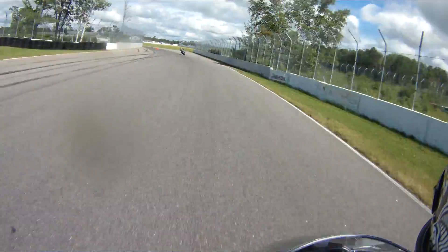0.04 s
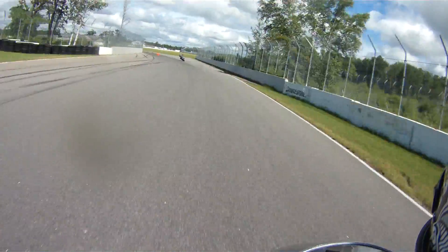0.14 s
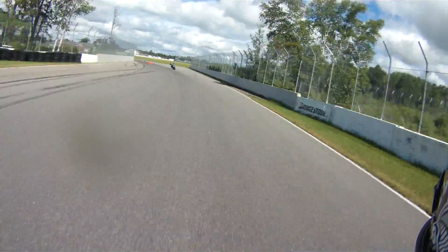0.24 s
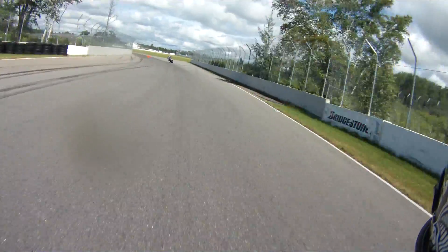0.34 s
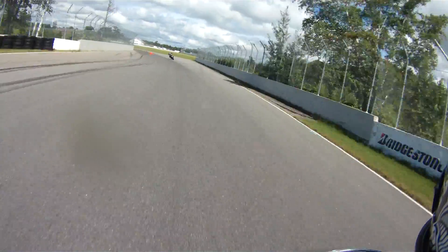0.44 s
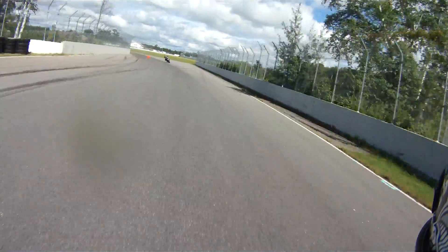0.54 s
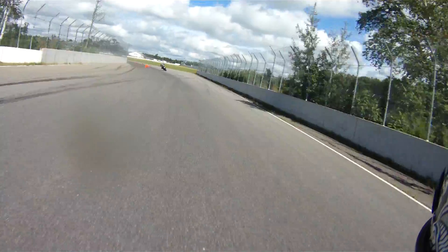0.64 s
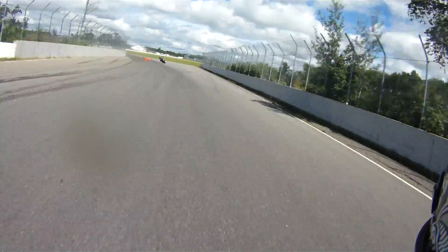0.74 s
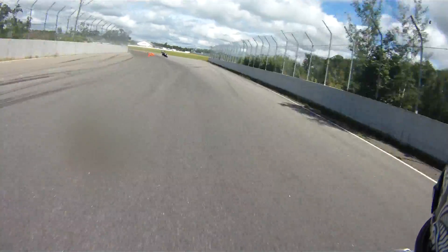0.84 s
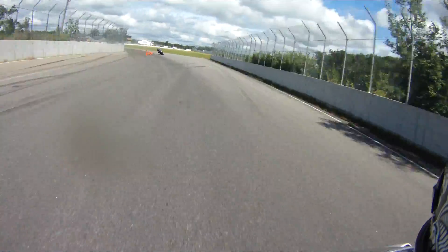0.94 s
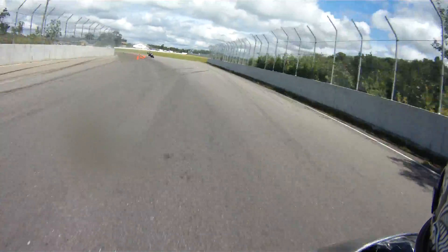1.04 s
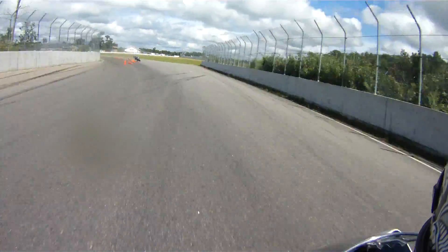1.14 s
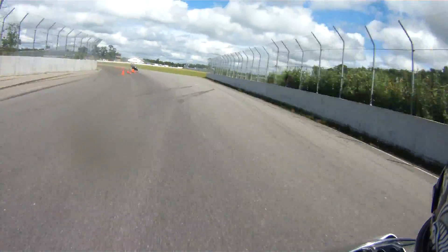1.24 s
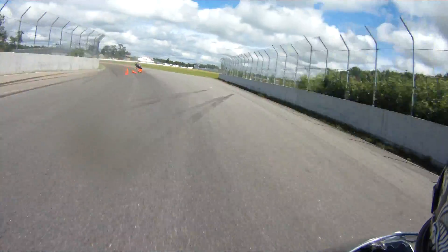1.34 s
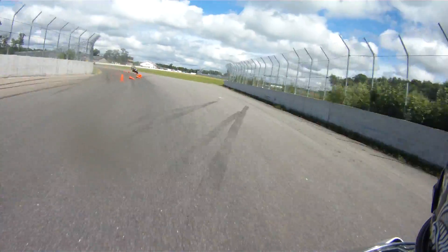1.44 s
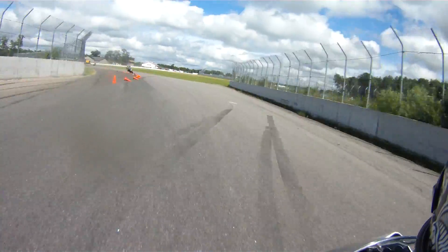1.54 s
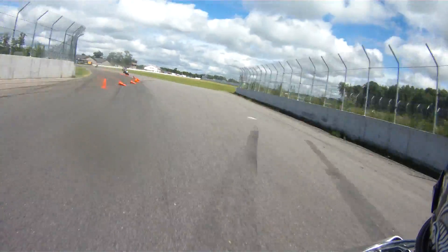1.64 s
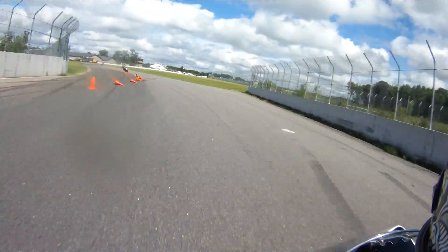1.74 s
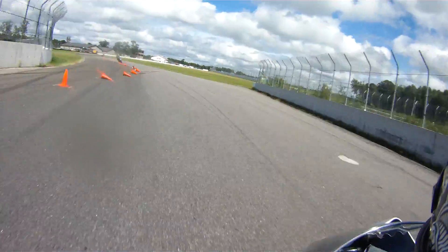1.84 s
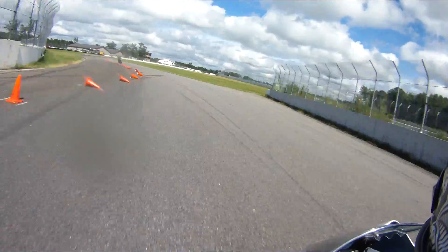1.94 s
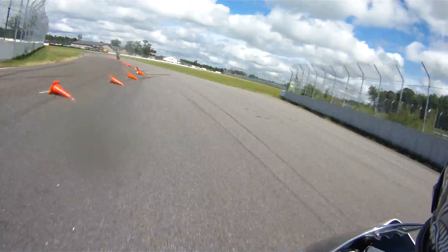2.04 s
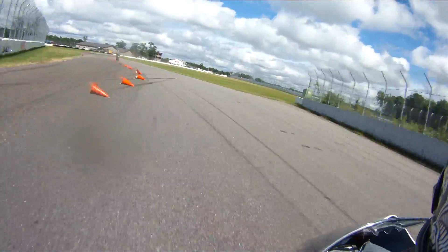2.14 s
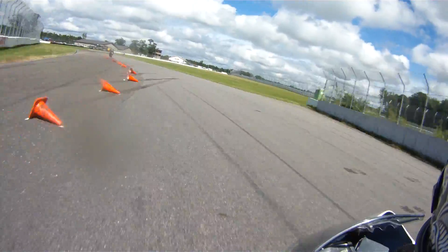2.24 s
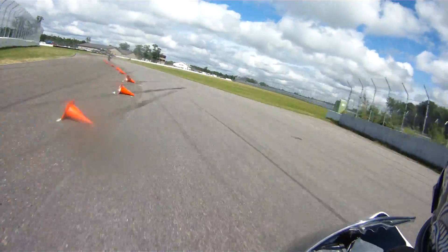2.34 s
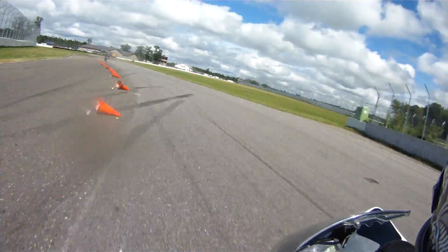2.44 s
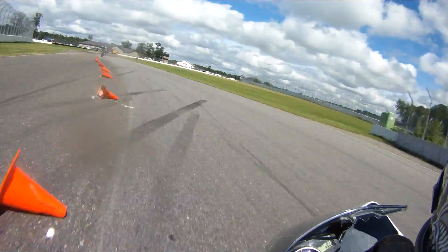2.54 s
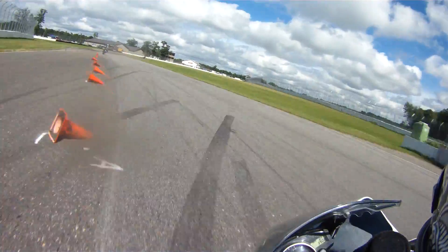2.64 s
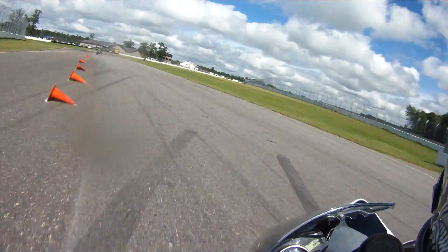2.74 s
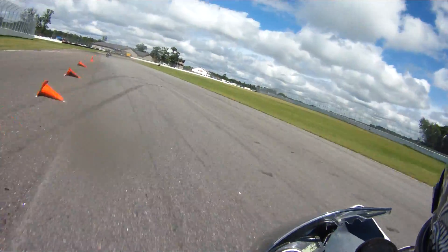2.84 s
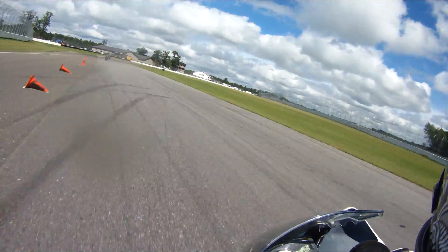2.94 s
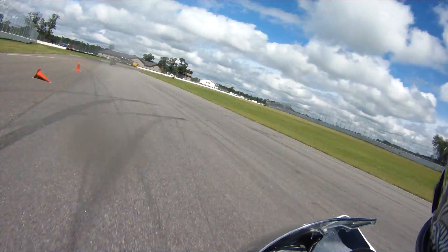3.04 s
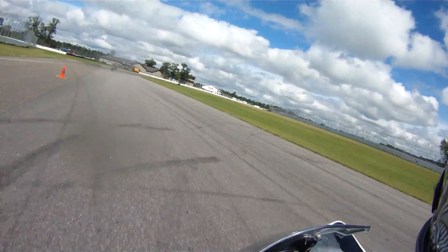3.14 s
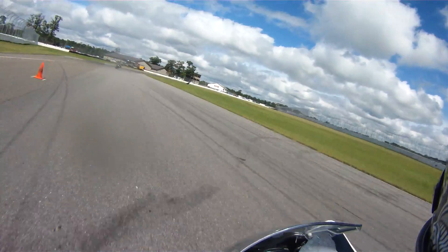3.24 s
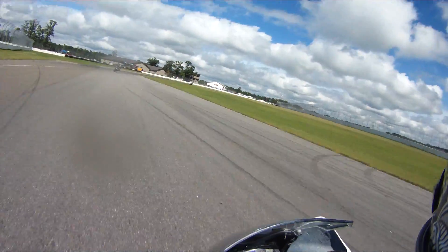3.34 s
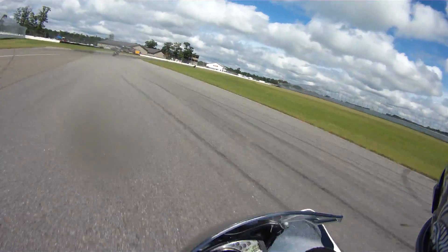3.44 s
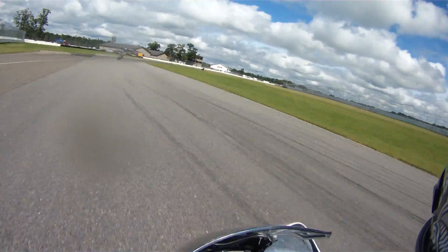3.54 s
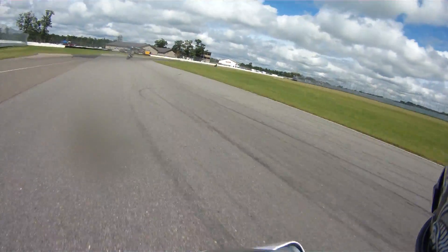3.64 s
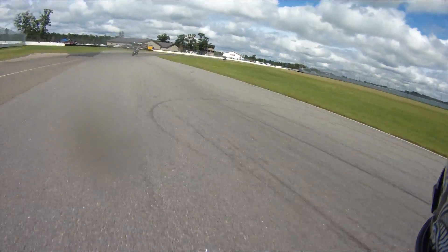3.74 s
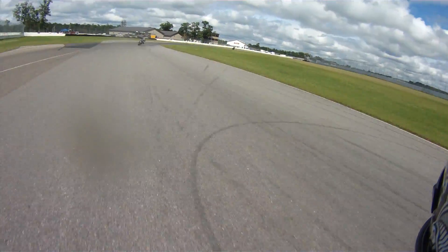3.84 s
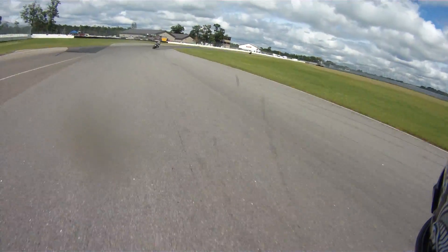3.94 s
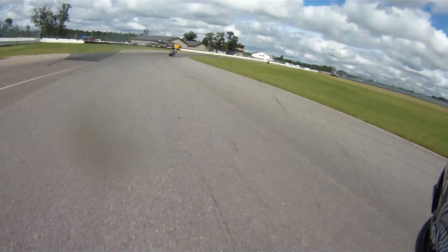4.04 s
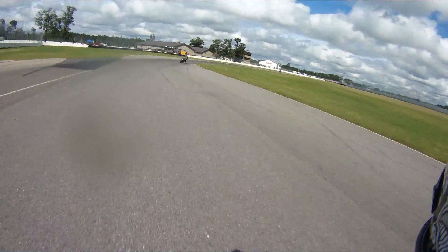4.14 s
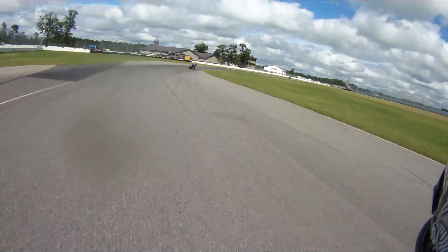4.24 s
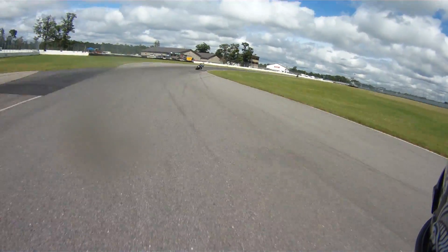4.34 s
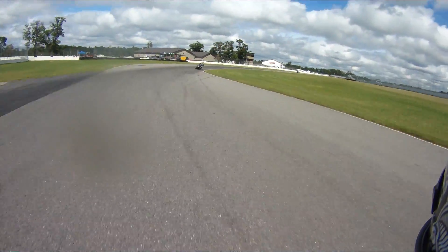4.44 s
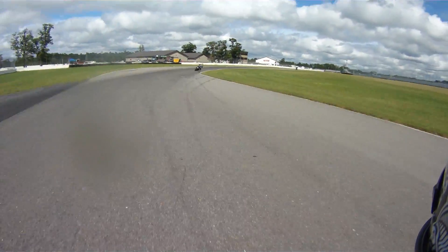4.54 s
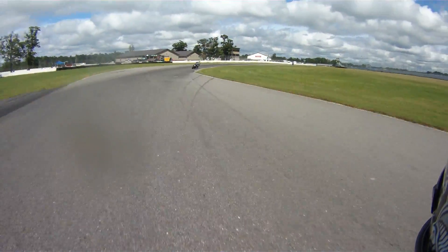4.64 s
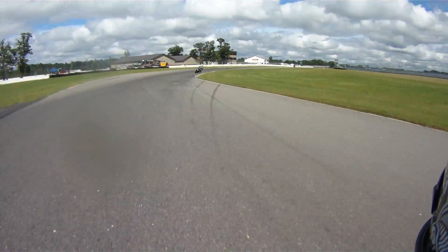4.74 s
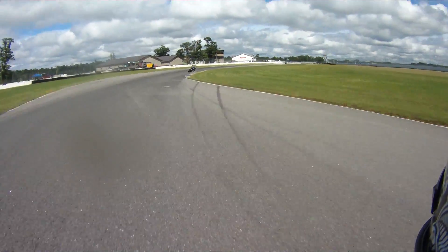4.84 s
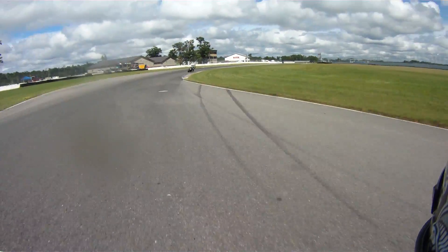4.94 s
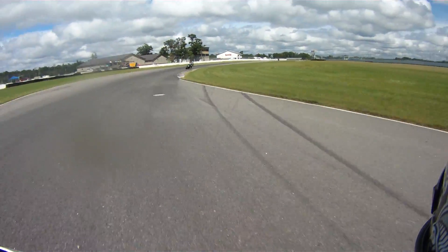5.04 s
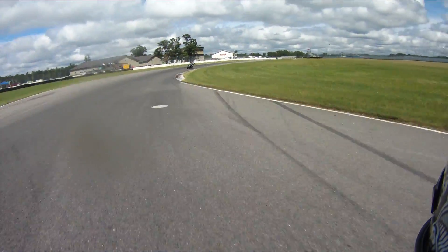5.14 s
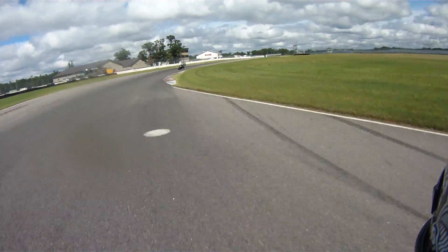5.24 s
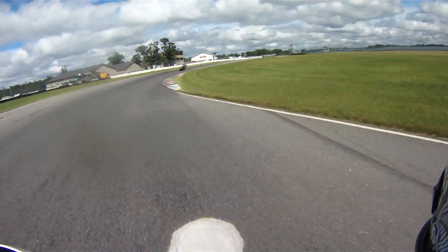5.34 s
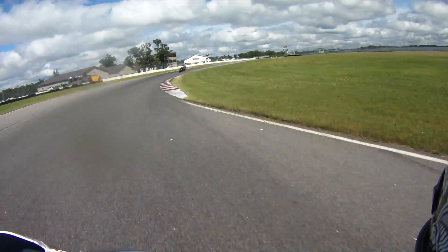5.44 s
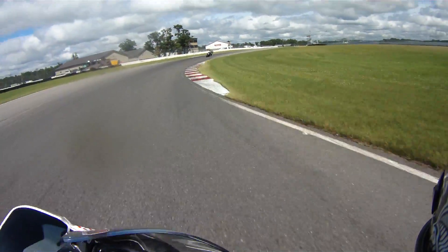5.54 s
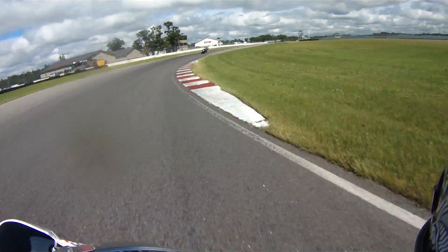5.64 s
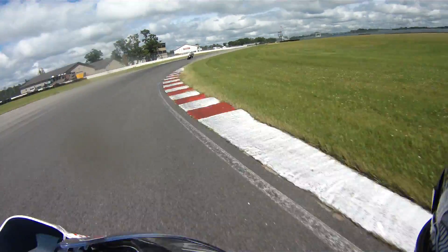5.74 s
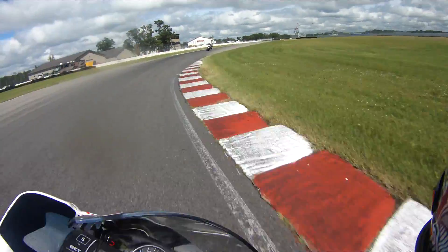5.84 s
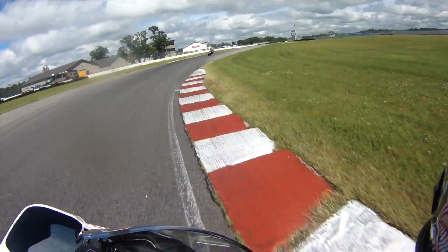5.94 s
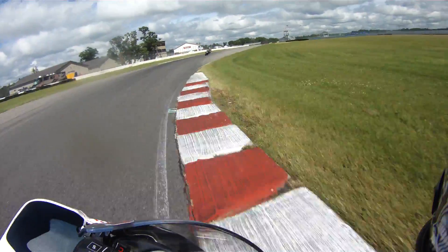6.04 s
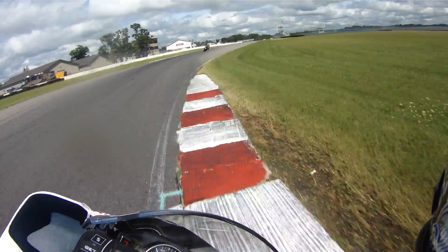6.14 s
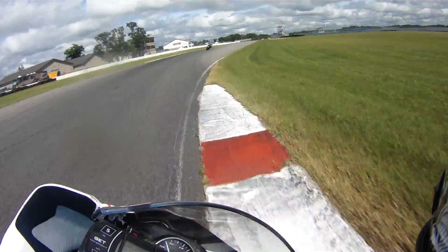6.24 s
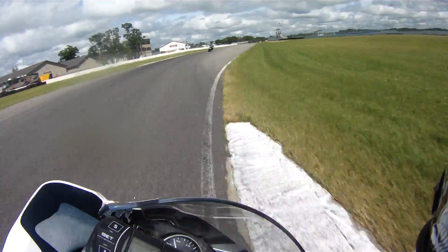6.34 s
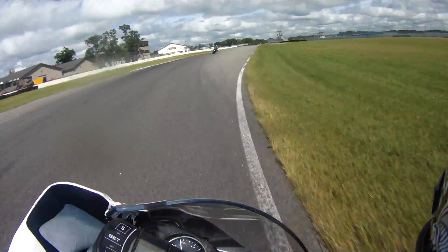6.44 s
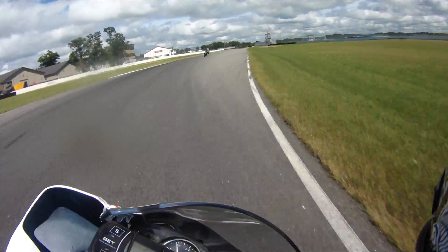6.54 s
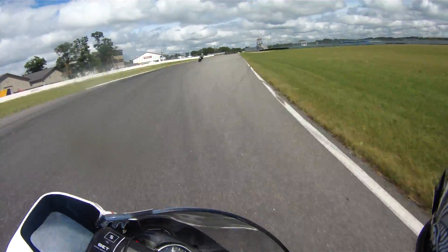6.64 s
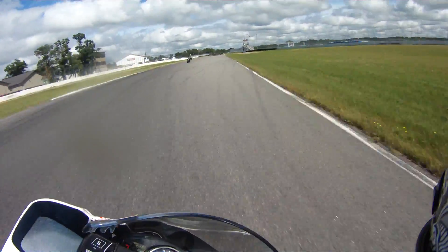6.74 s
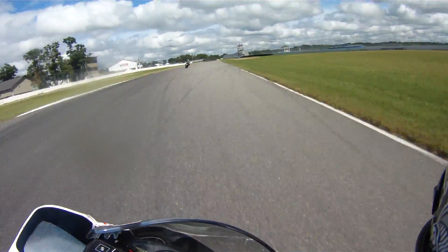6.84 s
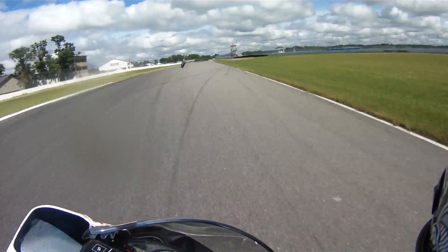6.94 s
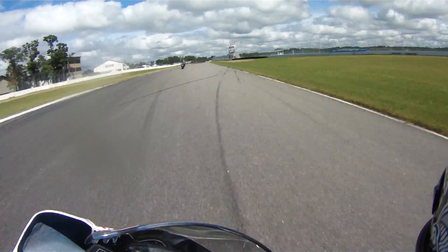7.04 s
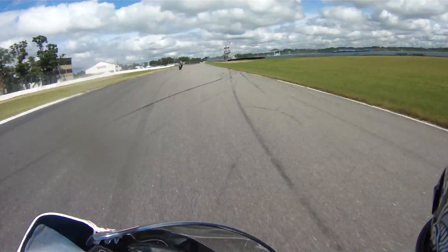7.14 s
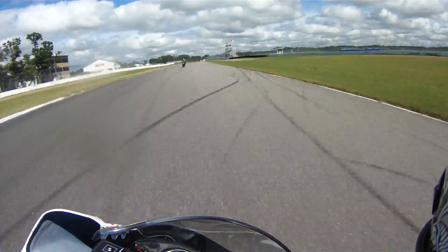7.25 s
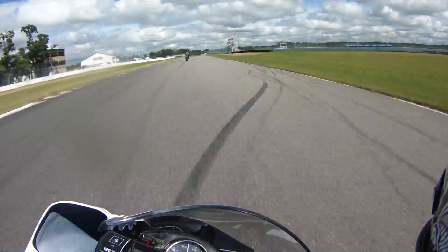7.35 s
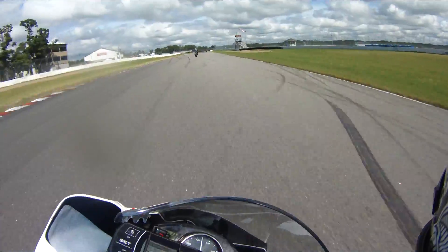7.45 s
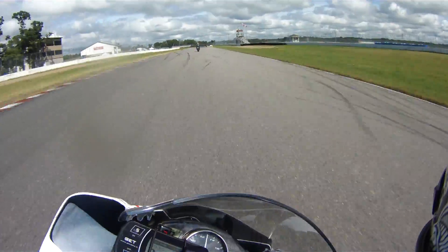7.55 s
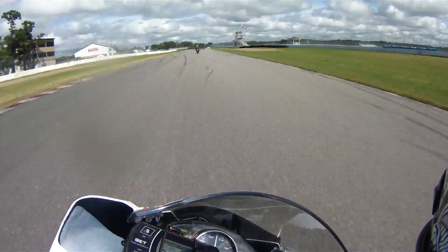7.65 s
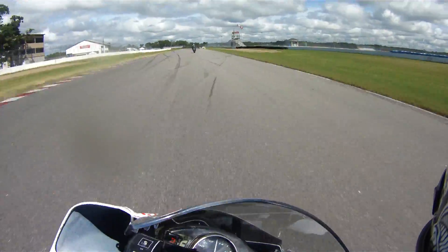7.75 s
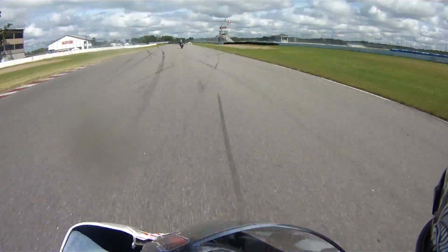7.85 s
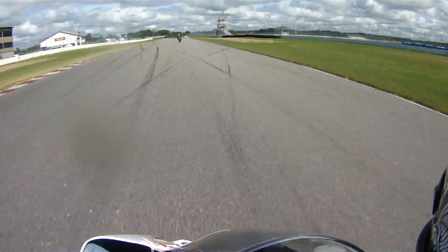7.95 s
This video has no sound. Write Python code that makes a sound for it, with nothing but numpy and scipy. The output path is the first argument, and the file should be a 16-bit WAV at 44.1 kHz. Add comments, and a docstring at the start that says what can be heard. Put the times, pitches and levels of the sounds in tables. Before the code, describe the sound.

Muffled wind roars and thumps against an enclosed microphone riding on a motorcycle. The engine, briefly audible, falls to a faint, uneven hum, howls for about half a second, and cuts out to a murmur with hollow growls of side wind. Tiny grit ticks come and go before a strong, nearly pure howl rises in pitch to the end, with stronger wind.

```python
"""On board a four-cylinder sport bike on a race track, microphone shut in a camera housing.
The intake howls a near-pure firing note when the throttle is open and murmurs when it is shut:
a sine follows the firing rate, with faint sines at other multiples around it.
Wind buffets, roars and hisses over the housing, made of bands of noise that are dull above 2 kHz.
Coarse hollow growls are noise in a broad resonance; small ticks are filtered clicks."""
import sys
import numpy as np
from scipy import signal
from scipy.fft import rfft, irfft, next_fast_len
from scipy.io import wavfile
from scipy.ndimage import uniform_filter1d

SR = 44100
rng = np.random.default_rng(int(sys.argv[2]) if len(sys.argv) > 2 else 0)


def inscribe(sig):
    """Save sig as 16-bit PCM at rate SR to the path in sys.argv[1].

    A 1-D sig is mono; a 2-D sig holds one channel per row.
    Samples are clipped to [-1, 1] before scaling.
    """
    pcm = np.round(np.clip(np.atleast_2d(sig).T, -1, 1) * 32767)
    wavfile.write(sys.argv[1], SR, pcm.astype(np.int16))


N = 352403
T = np.arange(N) / SR  # time of each sample, s


def undb(db):
    """Turn a level in dB into a gain."""
    return 10 ** (np.asarray(db) / 20)


def curves(table):
    """Join the values in each column of a table by straight lines in time."""
    time_s, *columns = np.transpose(table)
    return [np.interp(T, time_s, column) for column in columns]


def walk(rate_hz):
    """Wander at random: levels held for 1 / rate_hz seconds, smoothed twice, with a spread of 1."""
    hold = int(SR / rate_hz)
    steps = np.repeat(rng.standard_normal(N // hold + 1), hold)
    smooth = uniform_filter1d(uniform_filter1d(steps, hold), hold)[:N]
    return smooth / smooth.std()


def noise():
    """Give the frequencies, spectrum and length of white noise with unit power per Hz."""
    size = next_fast_len(N + N % 2, True)
    hz = np.fft.rfftfreq(size, 1 / SR) + 1e-9  # never zero, so its logarithm exists
    return hz, rfft(rng.standard_normal(size)) * np.sqrt(SR / 2), size


def engine(steady_db=0.5, waver_db=1.3):
    """Firing note and its orders; combustion is even under load and lumpy with the throttle shut."""
    # engine speed: time_s, firing_rate_hz
    firing = [(0.0, 324.0), (0.05, 330), (0.18, 332.1), (0.6, 331.5), (1.0, 327.7), (1.5, 316.8),
              (2.0, 309.9), (2.5, 319.1), (3.02, 342.1), (3.22, 348.3), (3.52, 350.7), (3.62, 341),
              (3.75, 326.2), (4.3, 311.1), (4.55, 307.3), (5.0, 305.4), (5.45, 319.5), (5.81, 334.9),
              (6.3, 353.5), (6.52, 365.7), (6.8, 377.4), (7.15, 387), (7.6, 397.2), (7.99, 401.4)]
    # throttle, heard as the level of the firing note: time_s, level_db
    throttle = [(0.0, -20.5), (0.04, -17), (0.19, -24), (0.225, -34), (0.6, -48), (0.8, -38), (0.95, -35.5),
                (1.08, -41), (1.2, -37), (1.38, -41), (1.5, -36.5), (1.7, -40.5), (1.9, -35.5), (2.2, -36),
                (2.5, -35.5), (2.65, -31), (2.82, -29), (3.02, -17), (3.12, -16.5), (3.44, -13.5),
                (3.57, -15.5), (3.65, -32.5), (3.69, -38.5), (3.76, -35), (3.95, -33.5), (4.3, -36),
                (4.52, -34.5), (4.6, -41), (4.7, -34.5), (5.05, -34), (5.25, -32.5), (5.5, -31.5),
                (5.63, -25.5), (5.69, -32.5), (5.77, -32.5), (5.795, -27.5), (6.1, -24.5), (6.39, -7.5),
                (6.6, -9), (6.75, -9.5), (7.0, -10.5), (7.2, -11), (7.99, -9)]
    # orders from unequal cylinders: every quarter of the firing rate from 0.5 to 7.5, but not the note
    faint_orders = np.delete(np.arange(2, 31), 2) / 4
    # one level per faint order, at full throttle: level_db
    faint_levels = [-49, -47.5, -42.5, -46, -44.5, -44.5, -51, -47.5, -50, -46.5, -52, -48.5, -53, -52,
                    -50.5, -52.5, -57, -53, -55, -60.5, -57.5, -58.5, -61.5, -59.5, -61.5, -60.5, -64,
                    -60.5]
    # an order swells or sinks for a while, keyed by order: centre_s, half_length_s, lift_db
    swells = {.75: [(6.33, 0.13, 6), (7.3, .25, 6), (7.8, .2, 6)], 1.25: [(6.6, .2, 2), (7.1, .25, -5.5),
              (7.8, .2, 5.5)], 1.5: [(3.1, .12, 5), (3.5, .1, 4), (6.3, .15, 5.5), (6.9, .15, 4)],
              1.75: [(0.12, 0.12, 12), (2.62, .08, 13), (2.85, 0.13, 12.5), (3.08, 0.18, 12),
              (3.45, .12, 9), (6.28, 0.086, 10), (7.95, 0.11, 2.5)], 2: [(3.15, .12, 6.5),
              (3.47, 0.14, 15.5), (5.97, 0.14, 13.5), (6.18, .04, -6), (6.45, 0.23, 16), (6.85, .06, 3),
              (7.6, .15, 3), (7.92, 0.18, 11.5)], 2.25: [(3.5, .08, 15), (7.2, 0.33, 9), (7.95, 0.12, 6)],
              2.5: [(6.27, .15, 9), (6.9, .12, 3.5)], 2.75: [(6.28, .12, 11), (6.9, 0.091, 5.5)],
              3: [(3.3, 0.25, 4.5), (6.3, .08, 5), (6.95, 0.4, 8.5), (7.7, 0.42, 9)], 3.25: [(6.9, 0.11, 4),
              (7.8, .2, 6.5)], 3.5: [(6.31, 0.09, 9), (6.9, 0.11, 5)], 3.75: [(6.5, 0.092, 3.5),
              (7.8, .2, 6)], 4: [(7., .2, 3.5), (7.55, .2, 4)], 4.25: [(7., .2, 5)], 4.5: [(6.5, .2, 7)],
              5: [(6.47, 0.091, 5), (7.3, .15, 5.5)], 5.25: [(6.95, 0.31, 6)], 6: [(6.5, .12, 9.5),
              (7.3, .1, 2.5)]}
    full_db = -10  # level of the note that counts as full throttle
    order_slope = 0.48  # dB of the faint orders per dB of the note
    lumpy_db = 4.0  # unevenness that a shut throttle adds to the note
    slip_hz, shut_slip_hz = 1.2, 3  # unevenness of the firing rate, and what a shut throttle adds
    drift_turns = 0.035  # each order drifts in phase on its own
    airbox_hz, airbox_width_hz, airbox_db = 1980, 25, 2  # lifts whichever order passes through it

    [firing_hz] = curves(firing)
    [note_db] = curves(throttle)
    load = np.clip(undb(note_db - full_db), 0, 1) ** 0.5
    shut = (1 - load) ** 4

    uneven_hz = (slip_hz + shut_slip_hz * shut) * walk(60)
    turns = np.cumsum(firing_hz + uneven_hz) / SR
    uneven_db = (steady_db + lumpy_db * shut) * walk(40)
    out = undb(note_db + uneven_db) * np.sin(2 * np.pi * turns)

    for order, full_level_db in zip(faint_orders, faint_levels):
        lift_db = AIRBOX = airbox_db * np.exp(-((order * firing_hz - airbox_hz) / airbox_width_hz) ** 2)
        for centre_s, half_s, peak_db in swells.get(order, []):
            lift_db = lift_db + peak_db * np.exp(-((T - centre_s) / half_s) ** 2)
        throttle_db = order_slope * (note_db - full_db)
        order_db = full_level_db + throttle_db + lift_db + waver_db * walk(20)
        phase_turns = order * turns + rng.random() + drift_turns * walk(30)
        out += undb(order_db) * np.sin(2 * np.pi * phase_turns)
    return np.sqrt(2) * out  # a sine at 0 dB gets an effective (RMS) level of 1


def wind(eddy_db=0.76, flicker_db=0.38):
    """Third-octave bands of coloured noise: eddies move all, patches move neighbours, each flickers."""
    # swell of the air, before each part takes its share: time_s, rush_db, hiss_db, low_db
    # (low is for rumble, buffet and roar)
    air = [(0, 0, 0, 0.5), (.6, 0.1, 0.1, 0), (1.2, -.7, 1, -.5), (1.8, -1.5, 0, 0),
           (2.3, -2.5, -2.5, -1.5), (2.8, -2, -2, -0.5), (3.1, .5, .5, 0), (3.4, 1.5, 1.5, 0.5),
           (3.9, 2.5, 2, -1), (4.45, -1.5, -1.5, -1), (5.05, -.5, -.5, .5), (5.35, -2, -2.5, 0),
           (5.6, -1, -1, 1), (6.2, 0, -.5, 0), (6.45, 2, 1, 1.5), (7.25, 2.5, 2.5, 1), (7.72, 5, 5.5, 3.5),
           (7.9, 4.5, 5, 2.5)]
    # centres of rumble, buffet, roar, rush and hiss: centre_hz
    part_centres = [70, 160, 600, 2000, 6000]
    # how much of its swell reaches each of these five parts: share (no unit)
    part_shares = [1.3, 1.4, 1, 0.58, 0.94]
    # how patchy each of the five parts is: spread_db
    patchiness = [.8, 1.6, 0.62, 0.24, .3]
    # usual wind colour through the housing: frequency_hz, level_db_per_hz
    housing = [(20, -82), (45, -71.5), (110, -64), (230, -61), (500, -61.5), (1000, -64), (2000, -71.5),
               (3000, -85), (4000, -93.5), (5000, -99), (7300, -105), (9000, -110), (12500, -114),
               (15000, -126)]
    # low gusts that thump the housing: centre_s, half_length_s, rumble_lift_db, buffet_lift_db
    gusts = [(.4, .06, 8, 4.5), (.68, .05, 4, 3), (.86, 0.1, 3, 3.5), (2.2, .5, -1.5, 1.5),
             (2.22, .04, -3, 2), (3.105, 0.089, 2, 0.5), (3.85, 0.24, -1.5, -0.5), (4.32, 0.067, -3, 4.5),
             (4.48, 0.17, 7, 8), (4.8, .07, 13.5, 2.5), (5.04, 0.028, 0, 7), (5.15, 0.024, 3, 4),
             (5.5, 0.11, -4, -1), (5.9, .25, 3.5, 0), (6.05, 0.041, 7, 1), (6.55, 0.4, 5.5, 2.5),
             (7.046, .12, 6.5, 6.5), (7.39, 0.12, 6.5, 5), (7.66, 0.08, 4, 5.5), (7.8, .07, 11, -2)]
    port_hz, port_width_hz, port_db = 5916, 910, 8.5  # the microphone port rings

    hz, white, size = noise()
    octave = np.log2(hz)
    colour_hz, colour_level_db = np.transpose(housing)
    colour_db = np.interp(octave, np.log2(colour_hz), colour_level_db)
    ring_db = port_db * np.exp(-((hz - port_hz) / port_width_hz) ** 2)
    coloured = white * undb(colour_db + ring_db)

    rush_db, hiss_db, low_db = curves(air)
    part_swells = (low_db, low_db, low_db, rush_db, hiss_db)
    swell_db = np.array([share * part_db + patch_db * walk(40)
                         for share, part_db, patch_db in zip(part_shares, part_swells, patchiness)])
    for centre_s, half_s, *lifts_db in gusts:
        swell_db[:2] += np.outer(lifts_db, np.exp(-((T - centre_s) / half_s) ** 2))

    eddies_db = eddy_db * walk(60)
    part_octaves = np.log2(part_centres)
    out = 0
    for centre in np.log2(20) + np.arange(30) / 3:
        # neighbouring bands overlap and add up to a flat response
        band_shape = np.clip(1 - 3 * abs(octave - centre), 0, 1)
        band = irfft(coloured * band_shape, size)[:N]
        # each band blends the swells of the two parts nearest on either side
        blend = [np.interp(centre, part_octaves, row) for row in np.eye(len(part_octaves))]
        band_db = blend @ swell_db + eddies_db + flicker_db * walk(9.4)
        out = out + undb(band_db) * band
    return out


def growls(rough_db=1.6, clump_db=1.2):
    """Noise in a broad resonance, chopped by quick eddies and bunched by slower ones."""
    # coarse hollow growls, as of side wind across the housing:
    # start_s, end_s, fade_s, centre_hz, width_hz, level_db
    side_gusts = [(3.445, 4.05, 0.11, 820, 235, -30.5), (5.037, 5.05, 0.004, 740, 250, -30),
                  (5.0, 5.3, 0.1, 600, 200, -38), (5.17, 5.22, .025, 550, 120, -34),
                  (5.4, 5.6, 0.06, 620, 200, -36), (5.5, 5.55, .025, 680, 180, -33),
                  (5.74, 5.85, .05, 680, 200, -36), (6.248, 6.55, 0.09, 840, 300, -36)]
    out = 0
    for start_s, end_s, fade_s, centre_hz, width_hz, level_db in side_gusts:
        hz, white, size = noise()
        resonance = np.exp(-((hz - centre_hz) / width_hz) ** 2 / 2)
        band = irfft(white * resonance, size)[:N]
        band = band * undb(rough_db * walk(160) + clump_db * walk(35))
        outside_s = np.maximum(start_s - T, T - end_s)  # negative while the growl lasts
        fade = 1 / (1 + np.exp(4 * outside_s / fade_s))
        out = out + undb(level_db) * fade * band / band.std()
    return out


def ticks():
    """Small ticks, as of grit: one-sample clicks rounded off by a band-pass filter."""
    # grit on the housing: time_s, peak_db (roughly the peak after the filter)
    grit = [(5.0384, -41), (5.9944, -41), (6.433, -41), (6.4405, -37)]
    low_hz, high_hz = 1800, 4500
    time_s, peak_db = np.transpose(grit)
    clicks = np.zeros(N)
    clicks[(time_s * SR).astype(int)] = undb(peak_db)
    band = signal.butter(4, [low_hz, high_hz], "bandpass", fs=SR, output="sos")
    # make up for the height that a click loses in the filter
    return signal.sosfilt(band, clicks) * SR / (2 * (high_hz - low_hz))


def scene():
    """Add engine, wind, growls and grit at one microphone."""
    return (engine() + wind() + growls() + ticks())[None]


def record(dry):
    """The camera cuts the top: a steep low-pass filter at 14.8 kHz."""
    low_pass = signal.ellip(8, 0.2, 70, 14800, fs=SR, output="sos")
    return signal.sosfilt(low_pass, dry)


dry = scene()
out = record(dry)
inscribe(out)
```